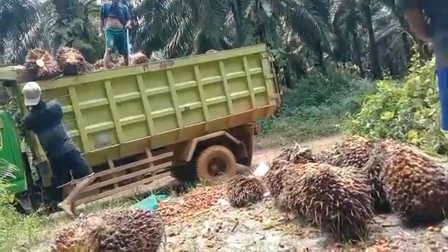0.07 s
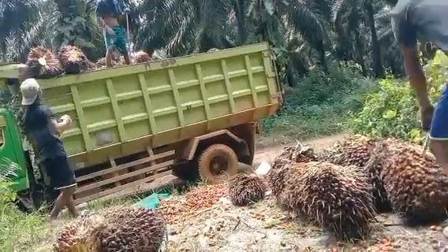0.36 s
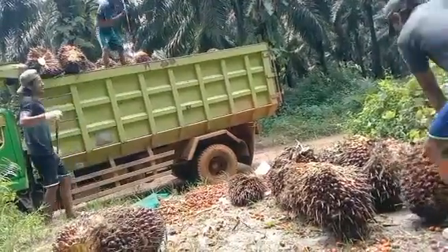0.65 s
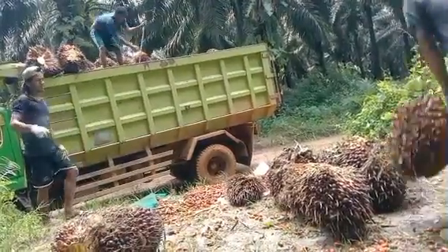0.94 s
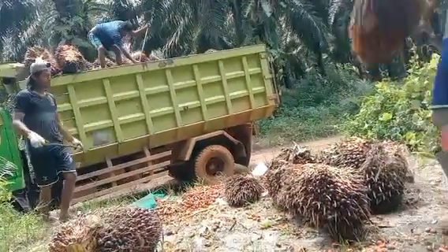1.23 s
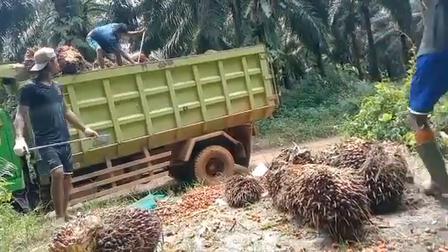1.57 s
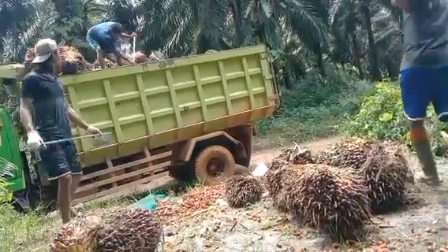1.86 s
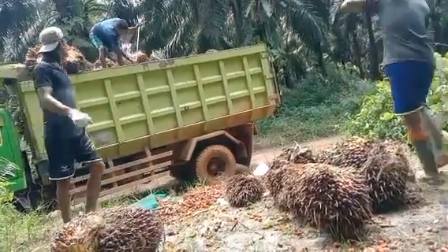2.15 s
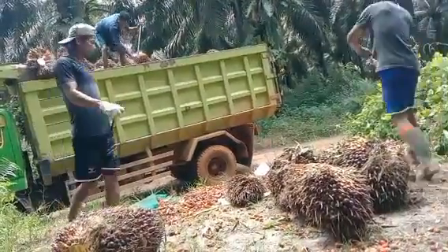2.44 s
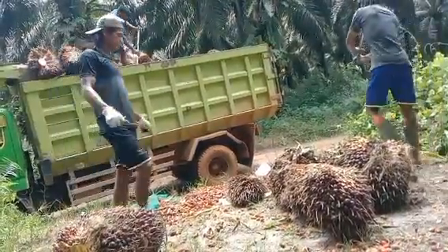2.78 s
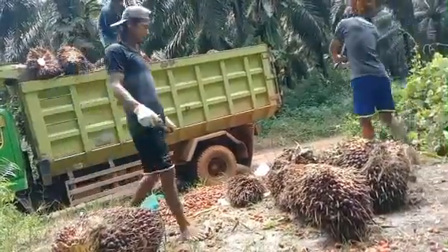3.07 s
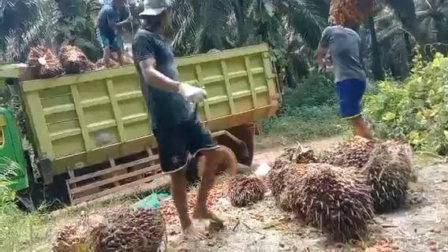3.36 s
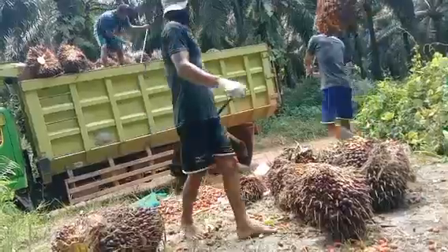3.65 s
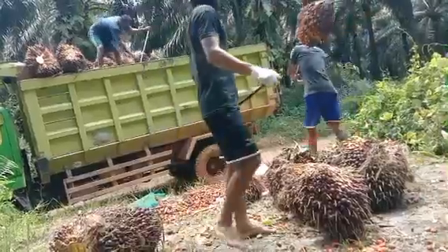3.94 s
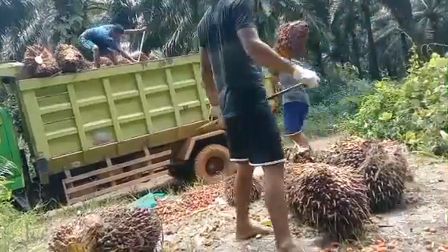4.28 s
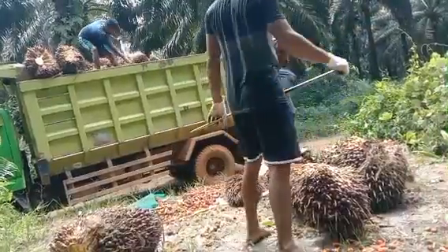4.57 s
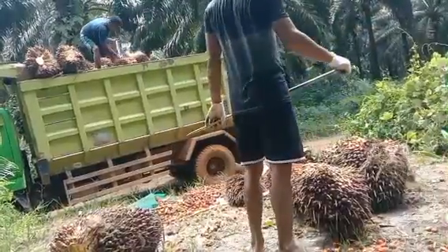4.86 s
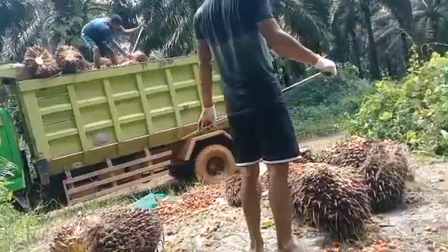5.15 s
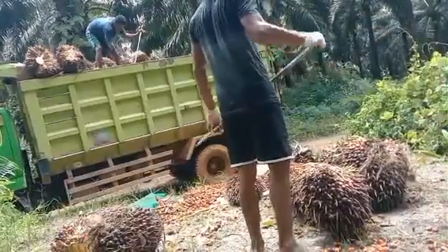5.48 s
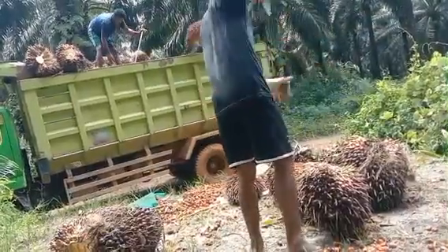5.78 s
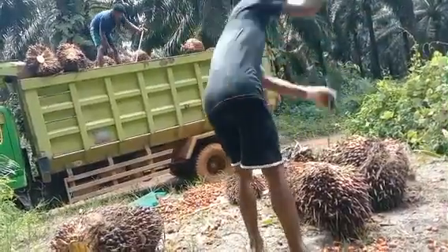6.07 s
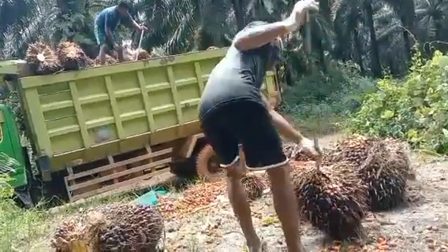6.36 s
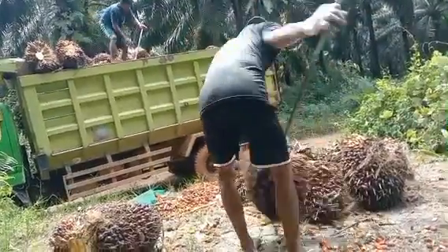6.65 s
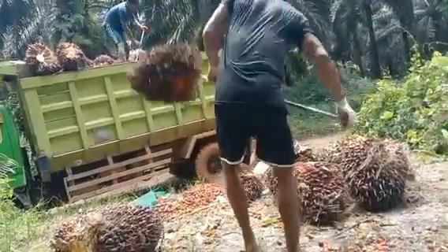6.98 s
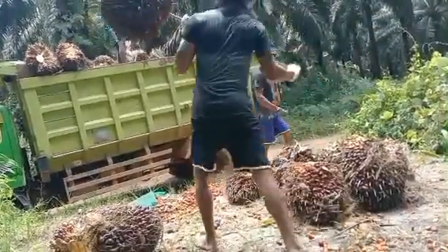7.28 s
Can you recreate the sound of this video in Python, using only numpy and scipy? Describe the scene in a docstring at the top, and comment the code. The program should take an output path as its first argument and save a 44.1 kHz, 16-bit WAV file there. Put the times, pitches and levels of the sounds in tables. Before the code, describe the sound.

Cicadas drone high and steady throughout in an outdoor plantation, with the loading work a few metres away. At 0.3 seconds a heavy palm fruit bunch thuds and crunches on bare earth, and loose fruits tick. At 0.9 a steel spike cracks loudly into a stalk, with a slight ring and a short echo from the trees. From 2.4 to 3.2 bunches bump softly on a steel truck bed. Dry fronds rustle faintly, and a second loud crack comes at 3.6. A distant bird chatters quietly from 4.1 to 4.8. Around 5 a bunch is dragged with a faint scrape. At 5.9 one lands with a loud thud and crunch, ringing the bed and tumbling. A quick cluster of fibrous cracks and very high metallic zings follows at 6.1 to 6.2. Small ticks, soft knocks and fainter zings near 7 finish it, with the cicadas continuing to about 7.5.

```python
"""Steel spikes crack into the stalks of palm fruit bunches as workers load a steel truck a few metres off.
Fibres snap and tear, and the struck tool rings. The heavy bunches thud and crunch, first on bare earth,
then on the ringing bed, where one is dragged; loose fruits tick. The palms scatter each blow back.
Behind it all cicadas drone, dry fronds rustle and a distant bird chatters in the plantation."""
import sys
import numpy as np
from scipy import signal
from scipy.fft import rfft, irfft
from scipy.io import wavfile

SR = 44100
rng = np.random.default_rng(int(sys.argv[2]) if len(sys.argv) > 2 else 0)


def unload_wav(signal):
    """Save mono or channel-first audio to the path in sys.argv[1] as 16-bit WAV at rate SR, clipped to [-1, 1]."""
    wavfile.write(
        sys.argv[1],
        SR,
        np.round(np.clip(np.atleast_2d(signal).T, -1, 1) * 32767).astype(np.int16),
    )


N = 331632


def undb(db):
    """Decibels to gain."""
    return 10 ** (np.asarray(db) / 20)


def unit(x):
    """Scale to rms 1."""
    return x / np.sqrt(np.mean(x ** 2))


def peak(x, db):
    """Scale to a peak level."""
    return x * undb(db) / np.abs(x).max()


def add(out, s, x):
    """Mix x into out from time s."""
    i = int(s * SR)
    x, i = x[max(-i, 0):], max(i, 0)
    out[i:i + len(x)] += x[:len(out) - i]


def through(x, response):
    """Pass a sound through an impulse response."""
    return signal.oaconvolve(x, response)[:N]


def colour(x, points, size=2048):
    """Minimum-phase EQ through points of (frequency [Hz], gain [dB])."""
    hz, db = np.transpose(points)
    log_hz = np.log(np.fft.rfftfreq(size, 1 / SR) + 1)
    cepstrum = irfft(np.log(undb(np.interp(log_hz, np.log(hz), db))))
    cepstrum[1:size // 2] *= 2
    cepstrum[size // 2 + 1:] = 0
    return through(x, irfft(np.exp(rfft(cepstrum))))[:len(x)]


def noise(points):
    """Coloured noise, rms 1."""
    return unit(colour(rng.standard_normal(N), points))


def walk(rate, size=N):
    """Random wander through `rate` points a second, spread near 1."""
    steps = np.arange(size) * (rate / SR)
    knots = rng.standard_normal(size // 32 + 2)
    return 0.81 * np.interp(steps, np.arange(len(knots)), knots)


def ring(modes, scatter_db=0):
    """Decaying modes, energy 1; scatter shifts their balance, as hitting another spot would."""
    hz, db, t60 = np.transpose(modes)[..., None]
    t = np.arange(int(t60.max() * SR)) / SR
    weight = undb(db + scatter_db * rng.standard_normal(db.shape)) * rng.choice([-1, 1], db.shape)
    y = (weight * np.sin(2 * np.pi * hz * t) * np.exp(-np.log(1000) * t / t60)).sum(axis=0)
    return y / np.linalg.norm(y)


def palms(x, t60=0.54, build_s=0.049, patchy_db=-1.2):
    """Trunks and fronds scatter a sound into a patchy reverb tail that builds up late."""
    t = np.arange(SR) / SR
    build = 1 - np.exp(-(t / build_s) ** 2)
    swell = build * np.exp(-np.log(1000) * t / t60) * undb(patchy_db * walk(120, size=SR))
    tail_eq = [(100, -0.5), (600, -5.5), (1300, -3.5), (3200, 0.5), (6000, -2), (12000, -5.5)]
    tail = colour(rng.standard_normal(SR), tail_eq)
    return through(x, tail * swell / np.linalg.norm(swell))


def air(level_db=-62.5, drift_db=0.4):
    """The faint, nearly steady stir of the plantation."""
    # tone of the ambience: (frequency [Hz], gain [dB])
    air_eq = [(30, -31.5), (80, 7), (180, 6.5), (350, -1), (650, -3), (1150, -0.5), (1500, 10), (2200, -5),
              (2900, 4), (4100, -7), (5000, 2.5), (6200, 9.5), (11000, -28.5), (15000, 6)]
    return noise(air_eq) * undb(level_db + drift_db * walk(1))


def rustle(attack_share=0.067, flicker_db=3):
    """Dry fronds brush together: a quick swell and a slow fade."""
    # brushes: (time [s], length [s], level [dB])
    brushes = [(1.646, 0.54, -65), (3.396, 0.17, -58)]
    # tone of dry fronds: (frequency [Hz], gain [dB])
    frond_eq = [(300, -28), (1300, -1), (2000, -11), (2800, 3), (3600, -10), (4300, -7), (6000, -6),
                (9000, -21)]
    t = np.arange(N) / SR
    swell = sum(undb(db) * np.interp(t, [s, s + attack_share * length, s + length], [0, 1, 0])
                for s, length, db in brushes)
    return swell * undb(flicker_db * walk(120)) * noise(frond_eq)


def birds(note_s=.105, arch=.09, jitter=.021, rasp=.84, echo_db=-5):
    """Harsh arched notes and a few thin whistles, half lost in the trees."""
    # chatter: (time [s], pitch [Hz], level [dB])
    notes = [(-.04, 709, -55), (3.22, 710, -69.5), (3.385, 696, -60), (4.116, 703, -54), (4.24, 670, -46.5),
             (4.372, 669, -48), (4.495, 741, -49), (4.645, 709, -50), (4.822, 720, -66)]
    # throat resonances: (frequency [Hz], gain [dB])
    throat_eq = [(900, -38.5), (1300, -14), (1480, 1), (1800, -3.5), (2080, -10), (2400, -7), (2800, -7),
                 (3500, 11.5), (4100, -7), (4800, -19.5), (6500, -29)]
    # distant whistles: (time [s], length [s], pitch [Hz], level [dB])
    whistles = [(.195, 0.042, 1438, -51.5), (.59, 0.069, 1370, -65), (6.98, 0.31, 1161, -59.5)]
    out = np.zeros(N)
    bow = np.sin(np.linspace(0, np.pi, int(note_s * SR)))
    for s, hz, db in notes:
        pitch = hz * (1 + arch * (bow - .6) + jitter * walk(250, size=SR)[:len(bow)])
        phase = 2 * np.pi * np.cumsum(pitch) / SR
        harmonics = unit(sum(np.sin(k * phase) for k in range(1, 9)))
        voice = harmonics + rasp * rng.standard_normal(SR)[:len(bow)]
        add(out, s, unit(colour(voice * bow, throat_eq)) * undb(db))
    for s, length, hz, db in whistles:
        swell = np.sin(np.linspace(0, np.pi, int(length * SR)))
        pitch = hz * (1 + 0.046 * walk(180, size=SR)[:len(swell)])
        add(out, s, np.sin(2 * np.pi * np.cumsum(pitch) / SR) * swell * undb(db))
    return out + undb(echo_db) * palms(out)


def cicadas(tymbal_hz=95, buzz=0.13, shrill_db=-40.5, flutter_db=1.4, swell_db=-0.94):
    """Cicadas buzz at their tymbal rate; a second, shriller chorus sits an octave above."""
    # bands of the lower and upper chorus: (frequency [Hz], gain [dB])
    drone_eq = [(5800, -55.5), (6350, -24), (6700, -8.5), (7100, -1.5), (7550, 0.5), (8200, -7),
                (8700, -19), (9200, -23), (10400, -27), (10900, -47)]
    shrill_eq = [(12600, -45), (13400, -30), (14000, -29.5), (14350, 2.5), (14800, -5), (15150, 5),
                 (15500, 6.5), (16000, -4.5)]
    # fader of the lower chorus: (time [s], level [dB])
    drone_fader = [(0.0, -45.5), (2.99, -45.5), (3.94, -46), (7.48, -46), (7.52, -44)]
    drone_db = np.interp(np.arange(N) / SR, *np.transpose(drone_fader))
    phase = 2 * np.pi * np.cumsum(tymbal_hz * (1 + .025 * walk(7.1))) / SR
    drone = noise(drone_eq) * (1 + buzz * np.sin(phase)) * undb(drone_db + 0.26 * walk(40))
    shrill = noise(shrill_eq) * undb(shrill_db + swell_db * walk(0.45) + flutter_db * walk(69))
    return drone + shrill


def loose_fruit(tick_s=0.0082):
    """Single hard fruits drop off, each with a short, hollow tick."""
    # ticks: (time [s], peak level [dB])
    ticks = [(0.366, -37.5), (.440, -41.5), (.499, -44), (0.521, -44.5), (1.917, -55), (6.281, -33.5),
             (6.666, -51), (6.741, -51.5)]
    hollow_eq = [(100, -20.5), (550, -4), (850, -13.5), (1130, 4.5), (1500, -10.5), (2400, -24),
                 (5000, -25.5), (8000, -39.5)]
    out, t = np.zeros(N), np.arange(SR // 12) / SR
    for s, db in ticks:
        contact = rng.standard_normal(len(t)) * t * np.exp(-2 * t / tick_s)
        add(out, s, peak(colour(contact, hollow_eq), db))
    return out


def drag(attack_s=0.036, release_s=0.14, scrape_db=-1, grain_db=3, rumble_db=1, judder_db=2.5):
    """A dragged bunch's spines catch and slip on the bed, which rumbles under the weight."""
    # two pulls: (time [s], length [s], level [dB])
    pulls = [(5.018, 0.14, -48.5), (5.224, .3, -49.5)]
    # tone of the spines and of the floor: (frequency [Hz], gain [dB])
    scrape_eq = [(100, -33.5), (400, -25), (950, -1), (1500, 3), (2100, -10), (2600, -6.5), (4200, -21),
                 (5300, -2.5), (8000, -64.5)]
    rumble_eq = [(40, -7.5), (110, 8.5), (170, 7.5), (330, 1), (600, -27), (1200, -38)]
    t = np.arange(N) / SR
    effort = sum(undb(db) * np.clip(np.minimum((t - s) / attack_s, (s + length - t) / release_s), 0, 1)
                 for s, length, db in pulls)
    treble_shelf = [(2300, 0), (2760, -5)]
    scrape = colour(noise(scrape_eq), treble_shelf) * undb(scrape_db + grain_db * walk(240))
    rumble = noise(rumble_eq) * undb(rumble_db + judder_db * walk(60))
    return effort * (scrape + rumble)


def thud(hz, db, thud_s=0.0032, sag=0.078, lumps=0.24, settle_s=0.011):
    """The pitch sags as the bunch squashes, and its lumps land a little after one another."""
    t = np.arange(SR // 6) / SR
    pitch = hz * (1 + sag * (2 * np.exp(-t / thud_s / 2) - 1))
    body = np.sin(2 * np.pi * np.cumsum(pitch) / SR) * t ** 2 * np.exp(-t / thud_s)
    band = [(hz / 4, -42), (hz / 2, -12), (hz, 0), (2 * hz, -12), (4 * hz, -42), (8 * hz, -65)]
    settle = colour(rng.standard_normal(len(t)) * t * np.exp(-t / settle_s), band)
    return peak(body, db) + lumps * peak(settle, db)


def crunch(db, top_hz, decay_s, attack_s=.0025, grain_db=3.1):
    """Hard fruitlets grind together; a lower top_hz makes the contact softer."""
    # tone of the fruitlets: (frequency [Hz], gain [dB])
    fruit_eq = [(30, -23.5), (90, -6.5), (300, 5), (650, -0.5), (1150, 1.5), (1700, -3.5), (2500, 0),
                (3500, -7), (4200, -16), (5600, 4.5), (8000, 2.5)]
    t = np.arange(SR // 6) / SR
    envelope = (1 - np.exp(-t / attack_s)) * np.exp(-t / decay_s)
    grind = rng.standard_normal(len(t)) * envelope * undb(grain_db * walk(300, size=len(t)))
    softness = [(top_hz / 10, -16), (.4 * top_hz, -4), (.92 * top_hz, 0), (1.3 * top_hz, -20),
                (2 * top_hz, -50)]
    return peak(colour(colour(grind, fruit_eq), softness), db)


def landing(hz, thud_db, crunch_db, top_hz, decay_s, bulk_lag_s=.022, bulk_db=-4.5):
    """First contact thuds and crunches; the bulk of the bunch follows with a second, low thud."""
    out = np.zeros(SR // 4)
    add(out, 0, thud(hz, thud_db) + crunch(crunch_db, top_hz, decay_s))
    bulk_hz = max(.74 * hz, 139)
    add(out, bulk_lag_s, thud(bulk_hz, thud_db + bulk_db))
    return out


def bunches(earth_until_s=1.5, bed_db=-14, echo_db=-15):
    """Heavy bunches land, shed fruit and are dragged; bare earth stays dead, the steel bed rings."""
    # landings and tumbles:
    # (time [s], thud pitch [Hz], thud level [dB], crunch level [dB], crunch top [Hz], crunch decay [s])
    landings = [(.304, 376, -31.5, -31.5, 2400, 0.026), (.322, 170, -34.5, -32.5, 1350, 0.0081),
                (.333, 335, -28.5, -39, 1390, 0.011), (.953, 257, -47, -50, 900, .04),
                (.992, 134, -52, -54, 686, 0.021), (2.377, 164, -43, -37.5, 1340, 0.027),
                (2.400, 504, -40.5, -39, 2075, 0.023), (2.630, 346, -31, -32, 1450, 0.034),
                (2.885, 165, -43, -63, 507, .02), (2.922, 169, -44.5, -72.5, 514, .02),
                (2.992, 166, -45.5, -80, 515, 0.016), (3.080, 203, -43, -75, 500, .02),
                (3.169, 330, -45, -49.5, 1750, 0.021), (3.588, 258, -43, -47, 602, 0.015),
                (4.046, 214, -49, -56.5, 513, 0.015), (4.51, 170, -61, -67, 1210, .016),
                (5.135, 166, -35.5, -47, 3100, 0.045), (5.586, 225, -42, -45, 1481, 0.04),
                (5.713, 324, -37.5, -29.5, 1470, 0.025), (5.825, 200, -48.5, -34.5, 1790, 0.025),
                (5.879, 278, -29.5, -13.5, 1970, 0.013), (5.896, 189.5, -14, -29, 5520, 0.033),
                (5.970, 176, -39.5, -30.5, 1560, 0.036), (6.009, 170, -40.5, -29.5, 1650, 0.026),
                (6.128, 220, -35, -27, 1840, 0.018), (6.423, 342, -42.5, -42, 1360, 0.029),
                (6.499, 183, -46, -42.5, 2200, 0.019), (6.828, 322, -49, -63.5, 772, 0.012),
                (6.978, 345, -49.5, -59, 790, 0.0096), (7.428, 208, -57, -74, 924, 0.023)]
    # modes of the steel bed: (frequency [Hz], level [dB], t60 [s])
    bed_modes = [(81, -15, .25), (138.3, 0, .24), (181.6, -10, .27), (269.7, -7, .1), (327, -0.5, .17),
                 (435, -14, .3), (464.3, -6, 0.17), (596, -10.5, 0.14), (790, 0, .14), (1006, -5, 0.26),
                 (1156, 3, .2), (1360, -4, 0.071), (1598, 5, .15), (1672, 3, .13)]
    out = np.zeros(N)
    panels = [ring(bed_modes, scatter_db=2) for _ in range(4)]
    for k, (s, *contact) in enumerate(landings):
        blow = landing(*contact)
        add(out, s, blow)
        if s > earth_until_s:
            add(out, s, undb(bed_db) * through(blow, panels[k % len(panels)]))
    out = out + loose_fruit() + drag()
    return out + undb(echo_db) * palms(out)


def spike_zings(rub_s=0.029, rub_db=-8):
    """The steel rod rubs and zings very high as it is driven in and pulled free."""
    # zings: (time [s], peak level [dB])
    zings = [(6.125, -30.5), (6.155, -28), (6.204, -24.5), (6.95, -40), (6.991, -41.5), (7.04, -43)]
    # modes of the thin spike: (frequency [Hz], level [dB], t60 [s])
    spike_modes = [(12930, -2, .14), (13470, 2, .12), (13570, -1, .06), (13920, 1, .13), (14600, -5, .07)]
    out, t = np.zeros(N), np.arange(SR // 8) / SR
    for s, db in zings:
        rub = rng.standard_normal(len(t)) * np.exp(-t / rub_s)
        add(out, s, peak(through(rub, ring(spike_modes)), db))
        add(out, s, peak(colour(rub, [(9000, -43.5), (12500, -11.0), (14000, 7)]), db + rub_db))
    return out


def fibres(burst, tilt_db):
    """Snapping fibres sound through the stalk, brighter or duller by a tilt per octave."""
    # stalk resonances: (frequency [Hz], gain [dB])
    stalk_eq = [(30, -72), (200, -36), (500, -21), (900, -14.5), (1600, 3), (2300, -3), (3000, 2.5),
                (3700, 1), (4250, -9.5), (5200, 5.5), (6100, 3), (7000, -21), (9000, -23.5), (12000, -12.5)]
    tilted = [(hz, db + tilt_db * np.log2(np.clip(hz, 700, 6000) / 3000)) for hz, db in stalk_eq]
    return colour(burst, tilted)


def stalk_cracks(splinter_db=-25, splinter_s=0.025, tear_db=-8, tear_lag_s=0.0068, tear_s=0.011,
                 knock_s=0.0061, tool_db=-7, clang_db=-1, clang_s=.003):
    """Steel bites a stalk: fibres snap, tear and splinter on; the tool rings and the palms answer."""
    # bites of spikes and blades:
    # (time [s], snap level [dB], length [s], tilt [dB/octave], echo send [dB], woody knock [Hz])
    bites = [(0.301, -26.5, 0.05, 3, -11.5, 940), (0.9394, -2.5, 0.0068, 4, -5.5, 940),
             (3.022, -29.5, .01, 21.5, -24.5, 3095), (3.5652, -5.5, 0.0057, -6.5, -9, 946),
             (6.140, -15, .018, 3.5, -16, 1140), (6.153, -7.5, 0.0062, -5.5, -13, 1674),
             (6.191, -18.5, 0.0051, 2, -23, 1186)]
    # modes of the struck tool: (frequency [Hz], level [dB], t60 [s])
    tool_modes = [(910, 3.5, .12), (1394, -1, .28), (1580, 0, .3), (2094, -3, .42), (2740, -1, .35),
                  (2916, -2, .6), (3190, -3, 0.54), (3644, -1, .55), (3710, -1, .6), (3830, -4, .55),
                  (5075, 1.5, .55), (5236, 1, .45), (5431, -2, .45), (5700, -3, .45), (5985, 1, .45)]
    clang_eq = [(950, -22), (1400, 1.5), (3000, 0)]
    near, far, t = np.zeros(N), np.zeros(N), np.arange(SR // 8) / SR
    for s, db, length, tilt_db, echo_db, knock_hz in bites:
        snap_noise, tear_noise = rng.standard_normal((2, len(t)))
        burst = np.sin(np.pi * np.minimum(t / length, 1)) + undb(splinter_db) * np.exp(-t / splinter_s)
        snap = peak(fibres(snap_noise * burst, tilt_db), db)
        knock = np.sin(2 * np.pi * knock_hz * t) * t * np.exp(-2 * t / knock_s)
        knock_db = db - 16.5 - tilt_db / 2  # a duller bite knocks more
        add(near, s, snap + peak(knock, knock_db))
        tear = fibres(tear_noise * np.exp(-t / tear_s), tilt_db / 2 - 2)
        add(near, s + tear_lag_s, peak(tear, db + tear_db))
        # a blow that carries far also rings the tool
        strength = np.linalg.norm(snap) * undb(echo_db)
        steel = ring(tool_modes)
        add(near, s, strength * undb(tool_db) * steel)
        # the snap and the first clang leave in all directions
        click = unit(fibres(signal.unit_impulse(len(t)), tilt_db=0))
        clang = unit(colour(steel[:len(t)] * np.exp(-t / clang_s), clang_eq))
        spray = click + undb(clang_db) * clang
        add(far, s, strength * spray / np.linalg.norm(spray))
    return near + palms(far)


def scene():
    """The loading work over the sounds of the plantation, in mono."""
    mix = air() + bunches() + stalk_cracks() + spike_zings() + rustle() + birds() + cicadas()
    return mix[None]


def record(dry, top_hz=15550):
    """A steep low-pass cuts the very top."""
    return signal.sosfilt(signal.ellip(10, .2, 80, top_hz, fs=SR, output="sos"), dry)


dry = scene()
out = record(dry)
unload_wav(out)
```